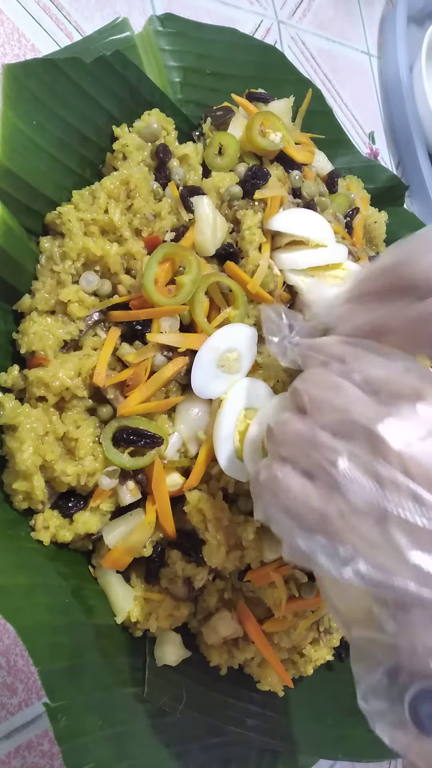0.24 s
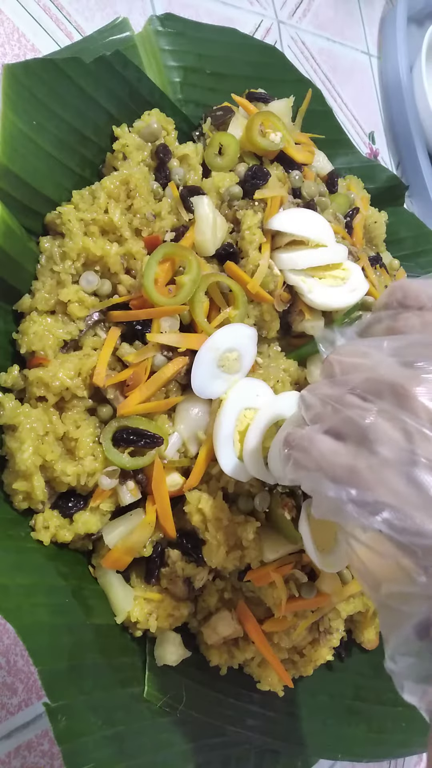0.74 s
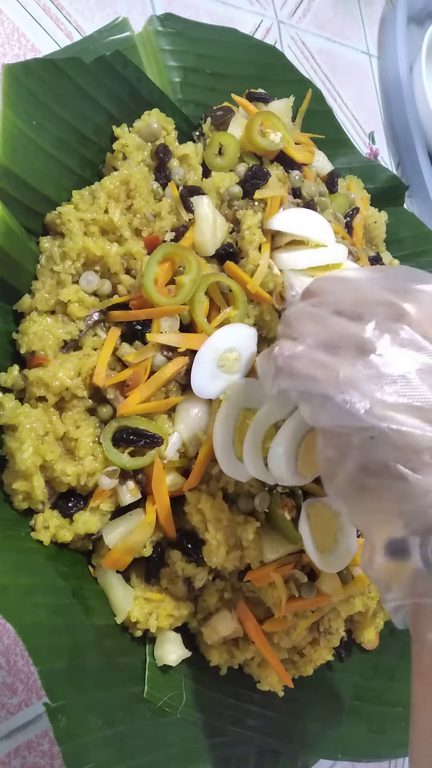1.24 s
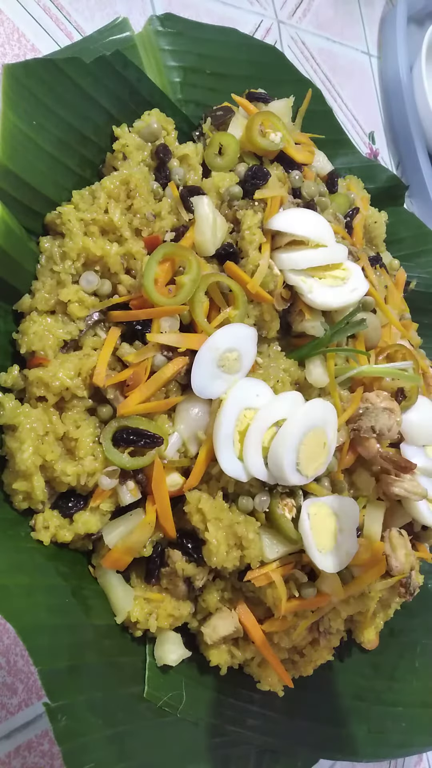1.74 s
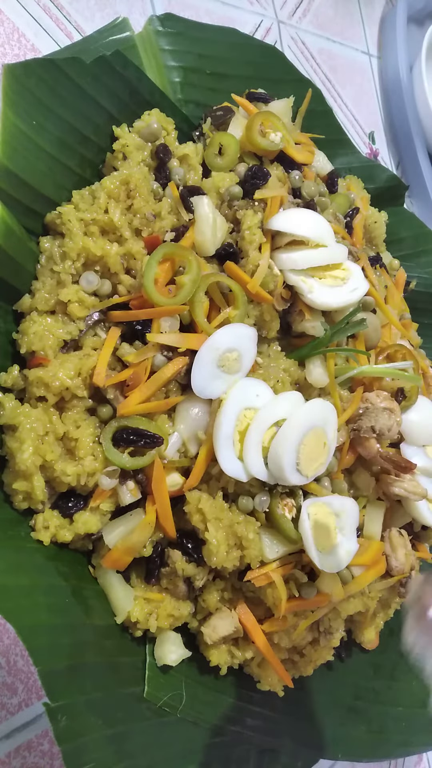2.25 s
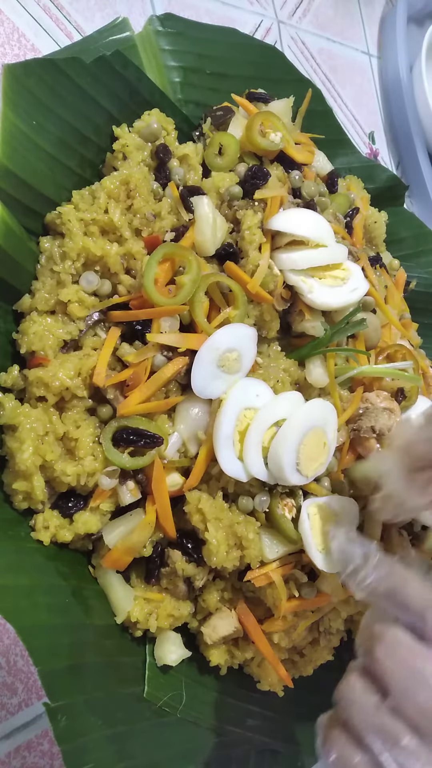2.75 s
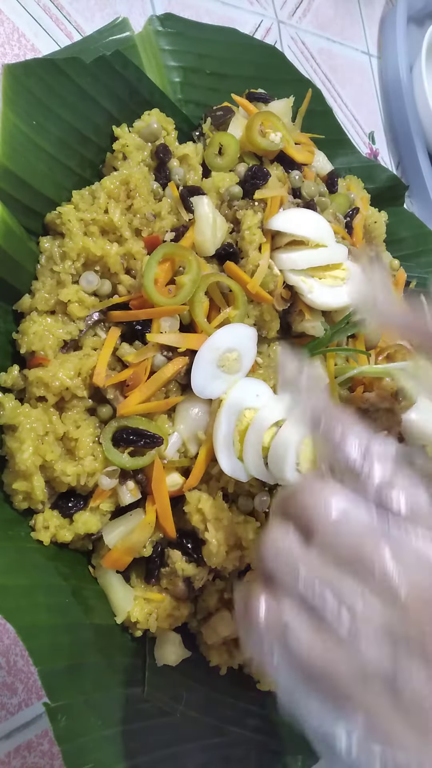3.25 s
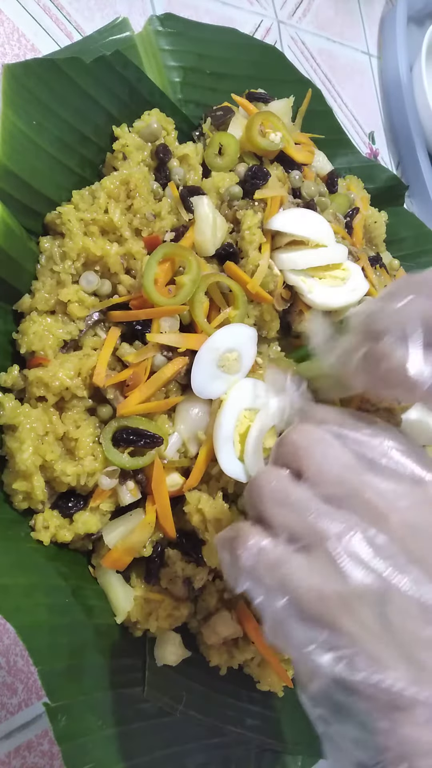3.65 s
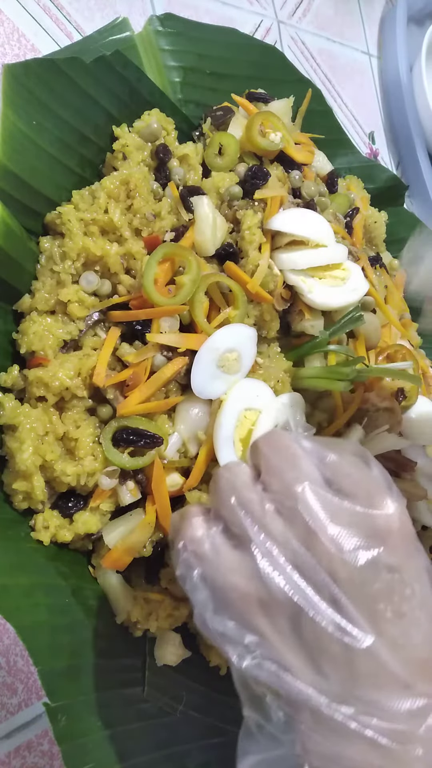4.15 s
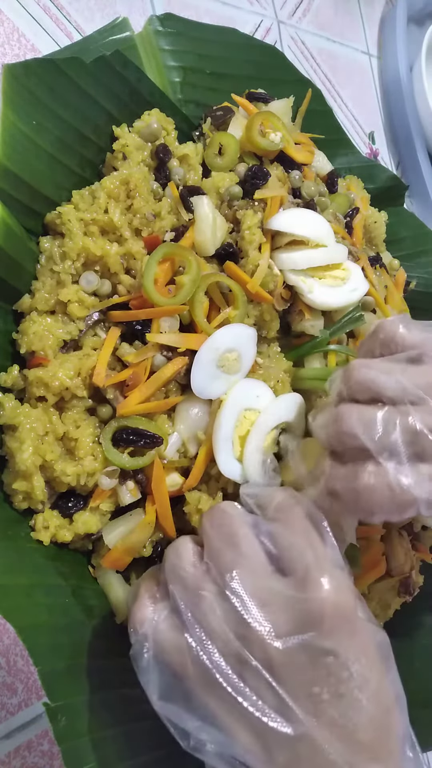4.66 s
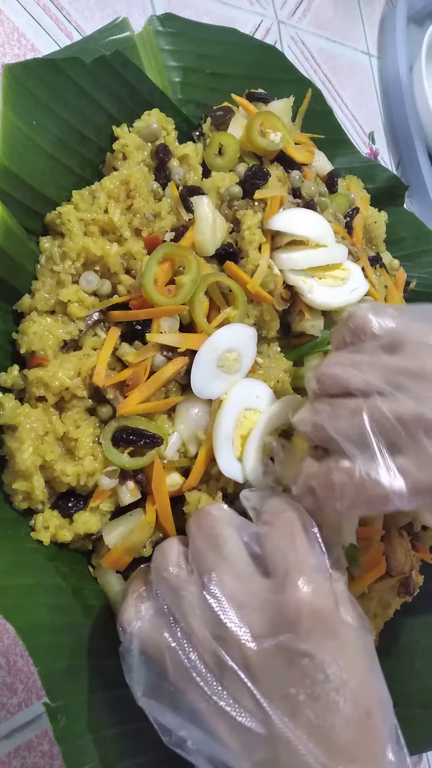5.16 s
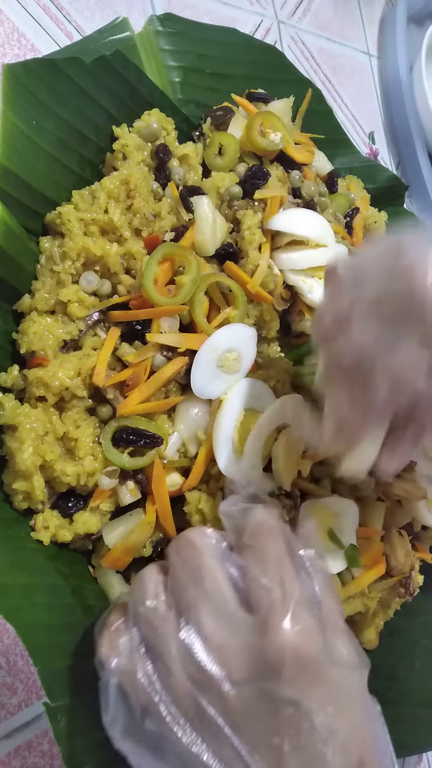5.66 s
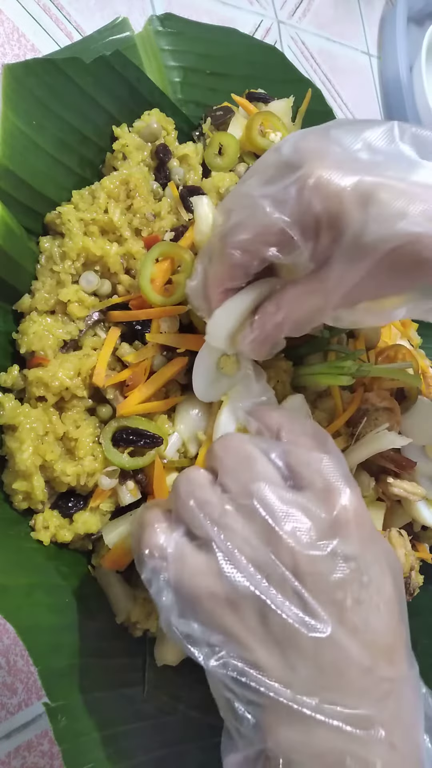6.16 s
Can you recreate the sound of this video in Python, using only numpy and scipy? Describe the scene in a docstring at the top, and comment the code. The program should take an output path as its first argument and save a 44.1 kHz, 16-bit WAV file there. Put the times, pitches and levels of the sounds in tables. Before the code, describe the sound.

Close, bright crinkling of thin plastic gloves comes in short bursts as hands place food, with faint damp squishing beneath. Dull, hollow knocks on a worktop, some with hard clicks and short scrapes, punctuate the first half, the last strong pair of sounds near three seconds. Afterwards dry crease snaps grow denser and knocks become faint. A small, slightly live kitchen with low rumble and hum; close stereo microphone.

```python
"""Thin plastic film crinkles close up: gloved hands lay toppings on rice in a small kitchen.
The crinkle is filtered noise shaped by swells of tiny buckles, over a faint rumble and an appliance hum.
Sharp snaps are short pitched ticks; dull knocks ring a worktop's modes and fill the room with noise.
Short scrapes shake the same modes with friction noise, hard edges click, and pressed rice gives soft bumps."""
import sys
import numpy as np
from scipy import signal
from scipy.fft import rfft, irfft, next_fast_len
from scipy.io import wavfile
from scipy.ndimage import uniform_filter1d

SR = 44100
rng = np.random.default_rng(int(sys.argv[2]) if len(sys.argv) > 2 else 0)


def pcm_store(signal):
    """Save signal as 16-bit PCM."""
    levels = np.round(np.clip(np.atleast_2d(signal), -1, 1) * 32767)
    wavfile.write(sys.argv[1], SR, levels.astype(np.int16).T)


N = 282681
TIME = np.arange(N) / SR
CUTOFF_HZ = 14300
LEFT_RIGHT = np.array([[1], [-1]])   # half of each pan goes to either side


def from_db(db):
    """Turn decibels into an amplitude factor."""
    return 10 ** (np.asarray(db) / 20)


def rms_one(x):
    """Scale a signal to rms 1."""
    return x / np.sqrt(np.mean(x ** 2) + 1e-20)


def at_hz(points, hz):
    """Read a spectrum on a log-frequency axis."""
    f, value = np.transpose(points)
    return np.interp(np.log(np.maximum(hz, 1)), np.log(f), value)


def at_time(points):
    """Draw a straight-line automation curve over the scene from (time, value) points."""
    return np.interp(TIME, *np.transpose(points))


# likeness of left and right in the room: frequency_hz, correlation [-1 to 1]
ROOM_LIKENESS = [(30, 0.53), (150, 0.97), (380, 0.79), (550, 0.48), (800, 0.41), (1600, 0.1), (3000, 0.052)]


def diffuse(spectrum):
    """Stereo noise as a room delivers it: alike in the bass, nearly unrelated in the treble; rms 1."""
    n = 2 * next_fast_len(N // 2 + 1)
    hz = np.fft.rfftfreq(n, 1 / SR)
    alike = np.clip(at_hz(ROOM_LIKENESS, hz), -1, 1)
    mid, side = rfft(rng.standard_normal((2, n)))
    both = np.sqrt(1 + alike) * mid + np.sqrt(1 - alike) * side * LEFT_RIGHT
    coloured = irfft(both * from_db(at_hz(spectrum, hz)))
    return rms_one(coloured[:, :N])


def drift(rate):
    """Smooth chance: random points, rate per second, joined by lines; rms 1."""
    points = rng.standard_normal(N // 20)
    return rms_one(np.interp(TIME * rate, np.arange(N // 20), points))


def even(x, seconds):
    """Hold the rms near 1 over the given stretch, keeping faster detail."""
    power = np.mean(x ** 2, axis=0)
    for _ in range(2):
        power = uniform_filter1d(power, max(int(seconds * SR), 1))
    return x / np.sqrt(np.maximum(power, 1e-12))


def strikes(times, levels_db):
    """One single-sample click for each event."""
    out = np.zeros(N)
    out[(np.asarray(times) * SR).astype(int)] = from_db(levels_db)
    return out


def dying(clicks, t60):
    """Envelope of the energy that clicks feed in, falling 60 dB in t60 seconds."""
    energy_kept = from_db(-120 / (t60 * SR))
    return np.sqrt(signal.lfilter([1], [1, -energy_kept], clicks ** 2 + 1e-18))


def soften(x, seconds):
    """One-pole lag that rounds an attack."""
    r = np.exp(-1 / (seconds * SR))
    return signal.lfilter([1 - r], [1, -r], x)


def ring(force, hz, t60):
    """Two-pole resonator: a unit click sets a dying sine of height 1 ringing."""
    r, w = np.exp(-np.log(1000) / (t60 * SR)), 2 * np.pi * hz / SR
    return signal.lfilter([0, np.sin(w)], [1, -2 * r * np.cos(w), r * r], force + 1e-18)


def swell(start, length, rise_s, fade_s):
    """Gain of one gesture: a linear rise, times an exponential fade once its length is over."""
    t = TIME - start
    rise = np.clip(t / max(rise_s, 1 / SR), 0, 1)
    return rise * np.exp(-np.clip((t - length) / max(fade_s, 1 / SR), 0, 20))


def pulse(centre_s, hz, width_s):
    """Sine of random phase under a bell of height 1: the samples it covers, and their values."""
    near = slice(max(int((centre_s - 4 * width_s) * SR), 0), int((centre_s + 4 * width_s) * SR))
    t = TIME[near] - centre_s
    bell = np.exp(-.5 * (t / width_s) ** 2)
    return near, bell * np.sin(2 * np.pi * (hz * t + rng.random()))


def grains(per_s, spread_db):
    """Random clicks that come in clumps, many small and a few large."""
    born = rng.random(N) < per_s * from_db(2.5 * drift(60)) / SR
    return born * from_db(spread_db * np.minimum(rng.exponential(1, N), 2.2))


def bursts(clicks, t60, scatter_db, tail_db, tail_t60):
    """Tiny bursts, each aimed its own way, over a longer-dying scatter of the same grains; rms near 1."""
    aimed = clicks * from_db(scatter_db * np.clip(rng.standard_normal((2, N)), -2, 1.3))
    short = rms_one(soften(dying(aimed, t60), 0.000063))
    tail = from_db(tail_db) * rms_one(dying(aimed, tail_t60))
    return even(short + tail, 0.18)


# colour of the close film in each channel: frequency_hz, density_db [dB per Hz, relative]
FILM_LEFT_COLOUR = [(300, -21), (1000, -20.5), (2000, -12.5), (4000, -17.5), (6000, -8), (8000, -4.5),
                    (9500, 0), (11000, 2), (12500, -0.5), (14300, -4.5)]
FILM_RIGHT_COLOUR = [(300, -33), (1000, -20), (2000, -15), (4000, -20.5), (6000, -15), (7300, -5.5),
                     (9000, 5), (10000, 7), (11000, -1.5), (12500, -2.5), (14300, -9.5)]
# borders of the bands that buckle separately: frequency_hz
FILM_BAND_EDGES = [100, 6000, 9000, 11500, 18000]


def film(low_hz, high_hz, channels=2):
    """One band of bright thin-film noise, coloured for each channel; the full spectrum has rms 1."""
    n = 2 * next_fast_len(N // 2 + 1)
    hz = np.fft.rfftfreq(n, 1 / SR)
    colours = FILM_LEFT_COLOUR, FILM_RIGHT_COLOUR
    gain = np.array([rms_one(from_db(at_hz(colour, hz)) * (hz < CUTOFF_HZ)) for colour in colours])
    band = (hz >= low_hz) * (hz < high_hz)
    return irfft(rfft(rng.standard_normal((channels, n))) * gain * band)[:, :N]


# fingers stirring between moves: time_s, crinkle_level_db
FINGER_FIDGET = [(0, -50.5), (.5, -48), (1.7, -53), (3.3, -44.5), (4.5, -47), (4.8, -52.5), (5.0, -50.5),
                 (5.3, -50), (5.75, -56.5), (6.4, -53.5)]
# hands reach, grip and let go: start_s, length_s, crinkle_level_db
HAND_MOVES = [(0.13, 0.18, -43), (0.436, 0.02, -45), (0.6, 0.11, -42.5), (0.714, 0.056, -43),
              (1.068, 0.0077, -45), (1.077, 0.047, -49.5), (1.063, 0.21, -51), (1.287, 0.12, -47.5),
              (1.472, 0.01, -43.5), (1.796, 0.089, -45.5), (1.911, 0.071, -45), (2.08, 0.12, -51),
              (2.264, 0.14, -50.5), (2.42, 0.15, -49.5), (2.572, 0.15, -44), (2.73, 0.23, -46.5),
              (3.005, 0.26, -43.5), (3.12, 0.25, -40), (3.368, 0.12, -44), (3.5, 0.13, -43.5),
              (3.703, 0.17, -46), (3.93, 0.081, -41.5), (4.068, 0.31, -50), (4.43, 0.23, -43.5),
              (4.715, 0.015, -46), (4.863, 0.015, -44), (4.93, .11, -49.5), (5.259, 0.17, -49.5),
              (5.395, 0.25, -50), (5.838, 0.096, -51), (6, 0.15, -52.5)]


def hand_effort():
    """The moves add their power to the steady stirring of the fingers."""
    power = from_db(at_time(FINGER_FIDGET)) ** 2
    for start, length, level_db in HAND_MOVES:
        # a move builds over 59 % of its length; then the film settles
        move = from_db(level_db) * swell(start, length, rise_s=0.59 * length, fade_s=0.047)
        power = power + move ** 2
    return np.sqrt(power)


# kind of contact: time_s, sliding_hiss_db, damp_squish_db [hiss against buckles; squish before its trim]
HAND_GRIP = [(0, -9.5, -11.5), (.75, 8, -11), (1.1, 1.5, -5.5), (1.7, 1.5, -12.5), (2.3, 1.5, -15.5),
             (3.3, 0, -14), (3.9, -2.5, -12), (5.6, -1, -7.5), (6.4, -8, -8.5)]
# colour of damp food: frequency_hz, density_db [dB per Hz, relative]
SQUISH_COLOUR = [(200, -50), (600, -0.5), (1500, -2), (2800, -1), (4500, 3), (7000, 4), (12000, -43)]


def crinkle(creases_per_s=1000, squish_trim_db=-0.5):
    """Faster hands buckle more creases; sliding film hisses and damp food squishes beneath it."""
    effort = hand_effort()
    time_s, slide_db, damp_db = np.transpose(HAND_GRIP)
    slide = from_db(np.interp(TIME, time_s, slide_db))
    damp = from_db(np.interp(TIME, time_s, damp_db))
    creases = grains(creases_per_s * rms_one(effort), spread_db=14.0)
    rustle = 0
    # each crease scatters differently in each band, so it has a colour of its own
    for low_hz, high_hz in zip(FILM_BAND_EDGES, FILM_BAND_EDGES[1:]):
        buckles = bursts(creases, t60=.0035, tail_db=1.0, tail_t60=0.045, scatter_db=4.5)
        envelope = np.sqrt((buckles ** 2 + slide ** 2) / (1 + slide ** 2))
        rustle += envelope * film(low_hz, high_hz)
    squelches = grains(350, spread_db=3.5)
    squish = bursts(squelches, t60=0.059, tail_db=-11.0, tail_t60=0.082, scatter_db=-0.5)
    squish = squish * diffuse(SQUISH_COLOUR)
    return effort * (rustle + from_db(squish_trim_db) * damp * squish)


# colour of the room rumble: frequency_hz, density_db [dB per Hz, relative]
RUMBLE_COLOUR = [(20, 5.5), (45, -2.5), (65, 5.5), (95, -0.5), (140, -1), (200, -5), (400, -8), (1000, -18),
                 (3000, -45), (14000, -47)]
# low hum that comes and goes: time_s, level_db [rms, before its waver]
HUM_LEVEL = [(0, -71), (0.6, -73), (1.1, -68.5), (1.3, -67.5), (1.85, -63), (2.05, -73.5), (3.1, -75.5),
             (3.3, -66.5), (3.75, -64), (4.0, -74.5), (4.9, -72), (5.2, -70), (5.7, -68), (6.1, -69.5),
             (6.4, -71)]


def background(rumble_db=-64, hum_hz=124.9, waver_db=3.0):
    """Noise for the room rumble; a sine of wandering phase and level for the appliance hum."""
    tone = np.sqrt(2) * np.sin(2 * np.pi * hum_hz * TIME + 1.5 * drift(12))
    hum = tone * from_db(waver_db * np.tanh(drift(6.5)))
    return from_db(rumble_db) * diffuse(RUMBLE_COLOUR) + from_db(at_time(HUM_LEVEL)) * hum


# single creases snapping through: time_s, peak_db, pan_db [left minus right], body_db [dull tone against peak]
CREASE_SNAPS = [(0.0286, -34.5, -6.0, -10.0), (0.0448, -37.5, -7.0, -17.0), (0.0787, -32.5, 0.0, -9),
                (0.0825, -38.5, -1.0, -25.0), (0.112, -38, -2, -12), (0.1635, -33.5, -3, -12),
                (0.188, -35, -3, -14), (0.197, -32.5, -8.0, -26.0), (0.219, -33.5, -8.0, -20.0),
                (0.3593, -28.0, 2.0, -26), (0.4673, -29.5, -4.0, -16.0), (0.4945, -33, -3, -14),
                (0.542, -25.0, -6.0, -23.0), (0.5744, -32.0, -3.0, -26), (1.1714, -33.0, -7.0, -19.0),
                (1.4625, -39.0, -8.0, -23.0), (1.6116, -35.5, -3.0, -24.0), (1.6202, -35.5, -8.0, -11.0),
                (1.6957, -43.5, -8.0, -20.0), (2.0936, -38.5, -8.0, -26), (2.4862, -32.0, -8.0, -21.0),
                (2.6036, -30.0, -5.0, -16.0), (2.8049, -30.0, -8.0, -24.0), (2.8191, -24.5, -8.0, -22.0),
                (3.4775, -29.5, -8.0, -24.0), (3.5842, -28.5, 4.0, -21.0), (3.6263, -26.5, -5.0, -21.0),
                (3.7539, -26.0, -5.0, -26), (3.8434, -24.0, 0.0, -14.0), (4.224, -30, -1, -12),
                (4.359, -31.5, -8.0, -15.0), (4.3898, -24.5, -4.0, -15.0), (4.4016, -29.5, 0.0, -24.0),
                (4.4315, -35.0, -8.0, -25.0), (4.4708, -28, -7, -20), (4.4727, -24.0, -6.0, -16.0),
                (4.6385, -27.5, -2.0, -24.0), (4.7875, -23.5, -1.0, -20.0), (4.8124, -34.0, -2.0, -16.0),
                (4.832, -37.0, -4.0, -24.0), (4.859, -34, 2, -18), (4.9035, -22.0, -5.0, -17.0),
                (4.9865, -34.5, -8.0, -26), (5.0576, -33.5, -1.0, -21.0), (5.1069, -36.0, -6.0, -12.0),
                (5.1294, -30.5, -1.0, -21.0), (5.2502, -34.0, 2.0, -9), (5.2826, -37.0, -7.0, -18.0),
                (5.3085, -29.0, 3.0, -14.0), (5.3701, -32.5, -3.0, -18.0), (5.4208, -33.5, 6.0, -22.0),
                (5.4937, -31.0, 4.0, -17.0), (5.6013, -35.0, -3.0, -18.0), (5.7149, -41.5, 1.0, -14.0),
                (5.7622, -43.5, -8.0, -15.0), (5.7652, -39.5, -8.0, -17.0), (5.7925, -38.5, 4.0, -9),
                (5.7958, -38.5, -2.0, -9.0), (5.8276, -38.0, -4.0, -22.0), (5.8799, -38.5, -8.0, -25.0),
                (5.9209, -33.0, -2.0, -14.0), (5.929, -34, -2, -12), (5.9345, -34.0, -5.0, -9.0),
                (5.9812, -36.0, 4.0, -15.0), (5.9907, -36.5, -2.0, -19.0), (6.0223, -40.0, -3.0, -18.0),
                (6.0376, -39.5, 6.0, -18.0), (6.0462, -41.5, -8.0, -10.0), (6.0658, -38.5, 2.0, -14.0),
                (6.0743, -39.0, -5.0, -9), (6.0995, -37, 2, -14), (6.1112, -36, 0, -12),
                (6.1498, -37.0, -3.0, -9), (6.2406, -40.0, 1.0, -9), (6.2708, -42.0, -8.0, -10.0),
                (6.2781, -39.5, -2.0, -10.0), (6.3051, -37.5, -1.0, -24.0), (6.3142, -38.5, -6.0, -26)]


def snaps(tail_db=-22.0, tail_t60=0.03):
    """A large crease flips in one dry pitched tick with a duller body; weaker flips and a faint hiss follow."""
    pitch_hz, body_hz, width_s = (8500, 12000), 4200, .00011
    after_s, after_db = (.0004, .0022), -8.5   # delay and level of two weaker flips
    out = np.zeros((2, N))
    for time_s, peak_db, pan_db, body_db in CREASE_SNAPS:
        flips = [(time_s, rng.uniform(*pitch_hz), peak_db), (time_s, body_hz, peak_db + body_db)]
        for _ in range(2):
            flips.append((time_s + rng.uniform(*after_s), rng.uniform(*pitch_hz), peak_db + after_db))
        for at, hz, level_db in flips:
            near, tick = pulse(at, hz, width_s)
            out[:, near] += from_db(level_db + LEFT_RIGHT * pan_db / 2) * tick
    time_s, peak_db, _, _ = np.transpose(CREASE_SNAPS)
    tail = dying(strikes(time_s, peak_db + tail_db), tail_t60)
    return out + tail * film(FILM_BAND_EDGES[0], FILM_BAND_EDGES[-1])


# knocks on the worktop: time_s, peak_db, direct_pulse_db, boom_db, clack_db,
# low_resonance_hz, high_resonance_hz [strongest of each; peak and clack drive several layers before trims]
WORKTOP_KNOCKS = [(0.446, -47, -57, -81, -49.5, 352, 755), (0.757, -21, -24, -42, -39, 488, 780),
                  (0.800, -26.5, -27.5, -69, -47, 472, 810), (0.994, -31.5, -34.5, -72, -41.5, 477, 910),
                  (1.015, -49, -39, -71, -45.5, 477, 910), (1.063, -52, -58, -69, -40.5, 377, 920),
                  (1.122, -61, -66, -61, -44, 377, 990), (1.364, -33, -37, -80, -41, 516, 760),
                  (1.414, -35, -43, -53.5, -49, 533, 1100), (1.497, -50.5, -51, -75, -61, 483, 1120),
                  (2.129, -35.5, -55, -38.5, -47, 514, 770), (2.155, -29, -36, -48, -42, 444, 745),
                  (2.477, -26.5, -30, -65, -36.5, 468, 1230), (2.518, -41, -36, -71.5, -56, 440, 1230),
                  (2.814, -52.5, -70, -77, -60, 487, 1100), (2.846, -43, -51, -61, -63, 360, 781),
                  (2.898, -58, -56, -70, -55.5, 500, 770), (3.191, -22, -26.5, -59, -40.5, 454, 774),
                  (3.211, -37, -29.5, -72, -48, 452, 780), (3.231, -44, -29, -72, -65, 475, 781),
                  (3.921, -29.5, -37, -56, -48.5, 540, 814), (4.891, -34, -38, -58, -54.5, 544, 1110),
                  (5.029, -39, -42.5, -71, -62, 493, 850), (5.653, -43, -51, -64.5, -62.5, 480, 1000),
                  (5.950, -47.5, -54, -64, -65, 407, 990)]


def first_bumps(width_s=0.0042, delay_s=0.0029):
    """Direct sound of each knock: a few cycles at its strongest low resonance, as the ringing builds."""
    out = np.zeros(N)
    for time_s, _, direct_db, _, _, centre_hz, _ in WORKTOP_KNOCKS:
        near, bump = pulse(time_s + delay_s, centre_hz, width_s)
        out[near] += from_db(direct_db) * bump
    return out


def mode_gain(hz, mode_db, pan_db, centre_hz):
    """The point of contact favours modes near one pitch; each mode has its own side."""
    octaves_off = np.minimum(np.abs(np.log2(hz / centre_hz)), .5)
    return from_db(mode_db - 28 * octaves_off + LEFT_RIGHT * pan_db / 2)   # 28 dB per octave


# the worktop's modes: frequency_hz, level_db [relative], t60_s, pan_db [left minus right]
WORKTOP_MODES = [(158.7, 9.5, 0.083, 2), (276, -1, 0.2, -2), (382.5, -5, 0.27, 3), (475.3, -2, 0.28, 7),
                 (526.5, -13.5, 0.38, -18.5), (575, -18, 0.1, -8), (592, 2, 0.13, -6),
                 (628.4, -0.5, 0.26, -2.5), (715, -11, 0.56, -3), (765, -2.5, 0.23, -4),
                 (818, -8, 0.19, -7), (881, -7, 0.2, 3), (909, 2, 0.12, -3.5), (1132, -1, 0.3, -1),
                 (1178, 2, 0.11, -3.5), (1196, 1, 0.19, 2), (1473, 0, 0.27, 3.5), (1950, -18, 0.21, -2)]
THUD_LOW_HZ, THUD_HIGH_HZ = 300, 760   # borders between low, middle and high modes
# room colours of a blow: frequency_hz, density_db [dB per Hz, relative]
BOOM_COLOUR = [(70, -56), (115, -14), (160, 6.5), (200, 5), (240, -3), (330, -5), (500, -21.5)]
THUD_COLOUR = [(200, -45), (320, -17), (390, -10), (480, -1.5), (620, -14.5), (750, -15), (1000, -36)]
CLACK_COLOUR = [(500, -11.5), (820, 3.5), (1020, -1), (1220, -1), (1480, -8), (1950, -11.5), (2300, -16),
                (2950, -12.5), (4500, -44), (9000, -23)]


def knocks(ring_db=-3.0, hard_db=3.0, thud_db=-11.5, clack_db=-2.5):
    """Each blow rings the worktop's modes and fills the room with a boom, a thud and a clack."""
    build_t60, lead_s, left_lag_s = 0.015, 0.0041, 0.0003
    time_s, peak_db, _, boom_db, high_db, low_hz, high_hz = np.transpose(WORKTOP_KNOCKS)
    start_s = time_s - lead_s
    out = np.zeros((2, N))
    for hz, mode_db, t60, pan_db in WORKTOP_MODES:
        # weight drives the lowest modes, hardness of contact the high ones
        if hz < THUD_LOW_HZ:
            drive_db = boom_db
        elif hz > THUD_HIGH_HZ:
            drive_db = high_db + hard_db
        else:
            drive_db = peak_db + ring_db
        centre_hz = high_hz if hz > THUD_HIGH_HZ else low_hz
        drive = from_db(drive_db + rng.normal(0, 1.5, len(time_s)))
        left, right = 20 * np.log10(drive * mode_gain(hz, mode_db, pan_db, centre_hz))
        force = np.array([strikes(start_s + left_lag_s, left), strikes(start_s, right)])
        out += ring(force, hz, t60) - ring(force, hz, build_t60)   # the ring takes a few cycles to build
    layers = ((BOOM_COLOUR, boom_db, .2), (THUD_COLOUR, peak_db + thud_db, .38),
              (CLACK_COLOUR, high_db + clack_db, .38))
    for colour, level_db, t60 in layers:
        envelope = soften(dying(strikes(start_s, level_db), t60), 0.0033)
        out += envelope * even(diffuse(colour), 0.016)
    return out


# things dragged over the worktop: start_s, length_s, groan_db, rasp_db [before trims], resonance_hz [strongest]
WORKTOP_DRAGS = [(0.713, 0.035, -40.5, -73, 480), (0.84, 0.17, -33, -70, 397),
                 (0.993, 0.046, -27, -64, 470), (1.047, 0.1, -63, -35.5, 460),
                 (1.375, 0.022, -49, -43, 500), (1.435, 0.075, -42, -70, 462), (1.72, 0.11, -54, -83, 530),
                 (2.449, 0.016, -49, -46, 527), (2.582, 0.047, -47.5, -69, 477),
                 (2.843, 0.035, -44, -50, 410), (3.165, 0.025, -44, -38.5, 466),
                 (4.392, 0.07, -48, -65, 478), (4.513, 0.13, -44.5, -52.5, 510), (4.66, 0.3, -53, -63, 493),
                 (4.793, 0.057, -53, -54, 376), (5.048, 0.12, -49, -60, 514), (5.95, 0.038, -52, -64, 435)]
# colour of rough contact: frequency_hz, density_db [dB per Hz, relative]
RASP_COLOUR = [(60, -46), (160, -2.5), (600, -1), (930, 1), (1100, 6), (1300, 0), (1700, -0.5), (2200, -13),
               (3200, 2), (4500, -13), (9000, -20)]


def drags(groan_trim_db=-12.0, rasp_trim_db=-11.5, upper_db=-12.0, judder_db=3.5):
    """Friction noise shakes the middle and high modes into a groan; its unevenly slipping rasp lies on top."""
    start_s, length_s, groan_db, rasp_db, centre_hz = np.transpose(WORKTOP_DRAGS)
    gestures = [swell(start, length, rise_s=0.021, fade_s=0.046)
                for start, length in zip(start_s, length_s)]
    groan, rasp = np.sqrt(from_db([groan_db, rasp_db]) ** 2 @ np.array(gestures) ** 2)
    centre = np.interp(TIME, start_s + length_s / 2, centre_hz)
    friction = diffuse(RASP_COLOUR)
    body = 0
    for hz, mode_db, t60, pan_db in WORKTOP_MODES:
        if hz > THUD_LOW_HZ:
            level_db = mode_db + upper_db * (hz > THUD_HIGH_HZ)
            body += ring(friction, hz, t60) * mode_gain(hz, level_db, pan_db, centre)
    slips = from_db(judder_db * drift(120))
    groaning = from_db(groan_trim_db) * groan * even(body, 0.063)
    return groaning + from_db(rasp_trim_db) * rasp * slips * friction


# a hard edge meets the worktop: time_s, click_db [drive], top_db [top against lower tones]
EDGE_HITS = [(0.753, -35, -10), (1.062, -37, 3.5), (2.127, -48, 7), (2.155, -49, -9), (2.472, -42, -10),
             (3.1865, -30, -6.5)]
# ring of that edge: frequency_hz, level_db [relative to the drive], t60_s
EDGE_TONES = [(1250, -14, .03), (1700, -12, .025), (2050, -12, .025), (2700, -14, .015), (3120, -16, .03),
              (3650, -17, .015), (4890, -20, .025), (5730, -17, .025), (6400, -15, .015), (7010, -14, .02),
              (7610, -17, .015)]
# crack of its contact: frequency_hz, density_db [dB per Hz, relative]
CRACK_COLOUR = [(600, -10), (1200, -19), (2000, -49), (3100, -10), (4300, -32), (5500, 5), (6800, 10),
                (9000, 5), (14000, -10)]


def edge_clicks(crack_db=-5.0, crack_t60=0.016, room_db=-14.0, room_t60=0.25, top_hz=4500):
    """Hard contact: an abrupt noise crack, a short metallic ring of modes and a little room."""
    time_s, click_db, top_db = np.transpose(EDGE_HITS)
    tones = 0
    for k, (hz, tone_db, t60) in enumerate(EDGE_TONES):
        level_db = click_db + tone_db + top_db * (hz > top_hz) + rng.normal(0, 1, len(time_s))
        tones += ring(strikes(time_s, level_db), hz, t60) * (-1) ** k   # alternate polarity
    contact = strikes(time_s, click_db + top_db)
    crack = from_db(crack_db) * dying(contact, crack_t60)
    room = from_db(room_db) * dying(contact, room_t60)
    return tones + (crack + room) * diffuse(CRACK_COLOUR)


# fingers pressing the rice down: start_s, length_s, level_db [before the swell and lumps]
RICE_PRESSES = [(4.382, 0.027, -52.5), (4.693, 0.05, -58), (4.833, 0.039, -57), (5.91, 0.045, -65),
                (6.162, 0.039, -58.5), (6.254, 0.15, -80)]
# colour of packed rice: frequency_hz, density_db [dB per Hz, relative]
PRESS_COLOUR = [(90, -35), (160, -25), (280, -7.5), (420, -13.5), (900, -24), (2000, -29)]


def presses():
    """Rice packed under the fingers gives soft, lumpy bumps of low noise."""
    force = sum(from_db(level_db) * swell(start, length, rise_s=0.048, fade_s=0.054)
                for start, length, level_db in RICE_PRESSES)
    lumps = from_db(4.4 * drift(35))
    return lumps * force * diffuse(PRESS_COLOUR)


# where the busier hand is: time_s, pan_db [left minus right]
HAND_SWAY = [(0, -2), (.55, -2), (1.2, -0.5), (1.6, -3), (2.15, -2.5), (2.6, -4.5), (3.14, -1.5),
             (3.45, -3), (4.3, -2), (5.2, -1), (6.4, -1)]


def scene():
    """Gloves and food close by, knocks and scrapes farther off."""
    sway = from_db(at_time(HAND_SWAY) * LEFT_RIGHT / 2)
    hands = sway * crinkle() + snaps() + presses()
    worktop = first_bumps() + knocks() + drags() + edge_clicks()
    return hands + background() + worktop


def record(dry):
    """A steep elliptic low-pass cuts the top."""
    return signal.sosfilt(signal.ellip(10, .2, 70, CUTOFF_HZ, fs=SR, output="sos"), dry)


dry = scene()
out = record(dry)
pcm_store(out)
```